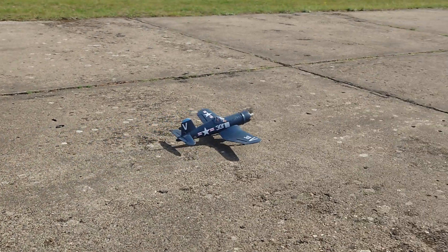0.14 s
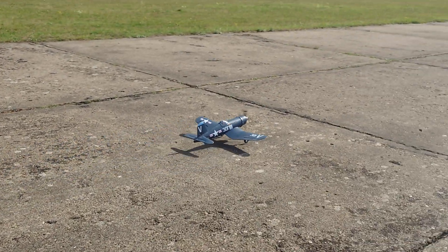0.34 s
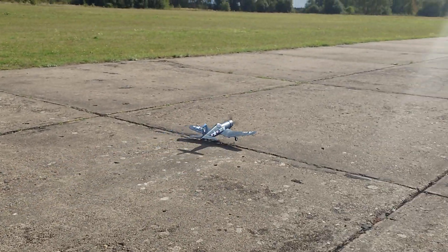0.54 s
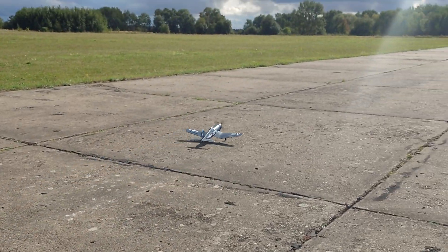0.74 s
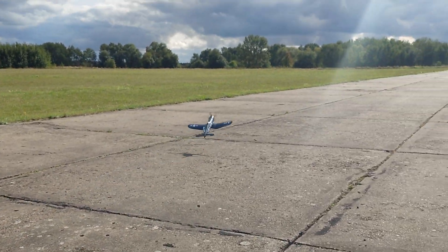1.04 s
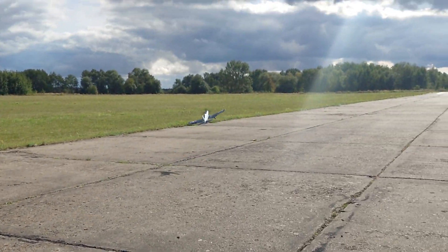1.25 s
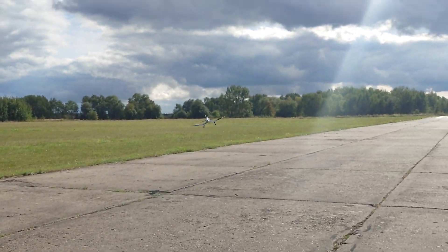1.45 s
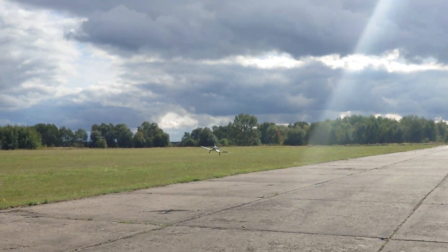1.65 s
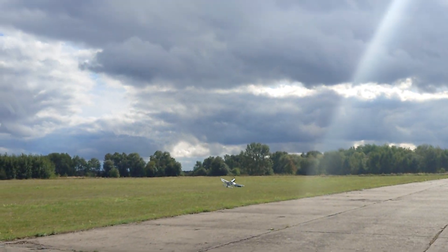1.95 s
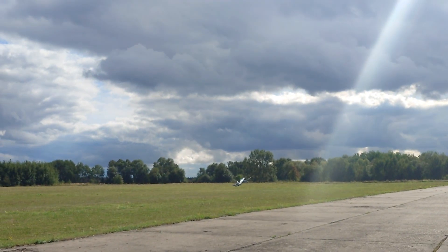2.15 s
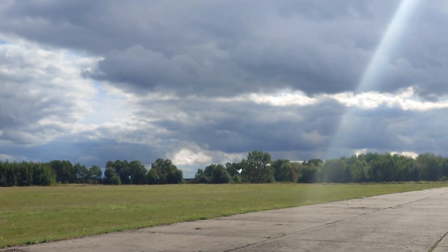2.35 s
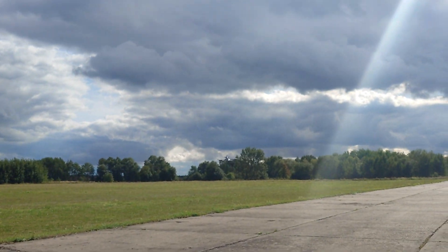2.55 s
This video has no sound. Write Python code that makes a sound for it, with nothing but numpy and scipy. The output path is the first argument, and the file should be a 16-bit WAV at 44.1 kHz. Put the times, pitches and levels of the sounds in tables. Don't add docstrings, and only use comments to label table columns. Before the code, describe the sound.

A small electric model plane rolls at full throttle over rough concrete, whining shrilly and rattling with sharp snaps, then lifts off and fades into the distance; wind buffets the close outdoor microphone.

```python
import sys
import numpy as np
from scipy import signal
from scipy.fft import rfft, irfft
from scipy.io import wavfile
from scipy.ndimage import uniform_filter1d

SR = 44100
rng = np.random.default_rng(int(sys.argv[2]) if len(sys.argv) > 2 else 0)


def inscribe(sig):
    pcm = np.round(np.clip(np.atleast_2d(sig).T, -1, 1) * 32767)
    wavfile.write(sys.argv[1], SR, pcm.astype(np.int16))


def boost_factor(decibels):
    exponent = np.asarray(decibels, float) / 20
    return 10 ** exponent


N = 119070
T = np.arange(N) / SR

# [t/s, level/dB]
PROP_LEVEL = [(0.0, -45.5), (0.36, -41.5), (0.61, -41.5), (0.89, -43), (1.62, -56.5), (1.79, -63.5),
              (2.04, -69), (2.35, -59), (2.53, -62.5), (2.7, -73.5)]


def rms_one(x):
    return x / np.sqrt(np.mean(x ** 2) + 1e-20)


def in_time(rows):
    seconds, *columns = np.transpose(rows)
    return [np.interp(T, seconds, column) for column in columns]


def drift(rate_hz):
    r = np.exp(-80 * np.pi * rate_hz / SR)
    slow = signal.lfilter([1], [1, -2 * r, r * r], rng.standard_normal(N // 40 + 2002))
    slow = rms_one(slow[2000:])
    return np.interp(np.arange(N) / 40, np.arange(len(slow)), slow)


def resonate(x, hz, width_hz):
    r = np.exp(-np.pi * width_hz / SR)
    poles = [1, -2 * r * np.cos(2 * np.pi * hz / SR), r * r]
    return signal.lfilter(np.array([1, 0, -1]) * (1 - r * r) / 2, poles, x)


def butter(x, order, hz, kind):
    return signal.sosfilt(signal.butter(order, hz, kind, fs=SR, output="sos"), x)


def colour(x, spectrum, patchy_db):
    spectrum_hz, spectrum_db = np.transpose(spectrum)
    edges = 140 * 2 ** np.arange(0, 7.2, 1 / 3)
    out = 0
    for k, (low, high) in enumerate(zip(edges, edges[1:])):
        middle = np.log(low * high) / 2
        level_db = np.interp(middle, np.log(spectrum_hz), spectrum_db)
        band = butter(x[k % 2], 2, [low, high], "band")
        out = out + boost_factor(level_db + patchy_db * drift(8.2)) * band
    return rms_one(out)


def grit(per_s, spread_db):
    size = boost_factor(spread_db * np.minimum(rng.exponential(1, (2, N)), 4.0))
    size = size * rng.choice([-1, 1], (2, N))
    return rms_one(size * (rng.random((2, N)) < per_s / SR))


def tone(hz):
    return np.sqrt(2) * np.sin(2 * np.pi * np.cumsum(hz) / SR)


def motor_pitch_and_level():
    # [t/s, f/Hz, level/dB]
    whine = [(0, 5485, -36), (.04, 5615, -28.5), (.1, 5742, -28.5), (.2, 5848, -32), (.33, 5895, -37),
             (.62, 5900, -46), (1.05, 5896, -44.5), (1.33, 5925, -50), (1.61, 5936, -57), (1.72, 5390, -69),
             (1.85, 4800, -70), (1.99, 4455, -65), (2.075, 4350, -69), (2.2, 4975, -58), (2.3, 5305, -46),
             (2.44, 5485, -53), (2.56, 5360, -62), (2.7, 4870, -64)]
    hz, db = in_time(whine)
    return uniform_filter1d(hz, size=2200), db


def motor_whine(hz, db):
    flutter_db = 2.0 * drift(7.1) + 1.26 * drift(135)
    return boost_factor(db + flutter_db) * tone(hz + 4.0 * drift(17.7))


def drive_train(whine_hz):
    # [multiple of whine, blur/Hz]
    orders = [(.099, 14), (.075, 20), (.247, 16), (.31, 35), (.5, 10), (.632, 8), (.79, 90), (.89, 55),
              (1.09, 12)]
    # [rolling/dB, climbing/dB, throttled back/dB, banked/dB, leaving/dB]
    order_db = [(-51, -74, -90, -74, -89), (-78, -83, -85, -83, -80), (-48, -77, -75, -66.5, -72),
                (-74, -113, -68.5, -77, -98), (-86, -94, -100, -66.5, -88), (-51, -63.5, -85.5, -84, -80),
                (-105, -61.5, -74, -57.5, -93), (-69, -80, -88, -79, -57.5), (-85, -93, -95, -68, -79)]
    stages = [.6, 1.7, 2.05, 2.4, 2.65]
    spool_up_db, spool_up_s = -12, 0.45
    clean_below_hz = 20
    prop_db, = in_time(PROP_LEVEL)
    sway_db = 0.4 * (prop_db - uniform_filter1d(prop_db, size=30000))
    spool_db = spool_up_db * np.clip(1 - T / spool_up_s, 0, 1)
    out = 0
    for (share, blur_hz), stage_db in zip(orders, order_db):
        level_db = np.interp(T, stages, stage_db) + sway_db + spool_db
        firm = clean_below_hz / blur_hz
        rough = (firm + drift(blur_hz * 2)) / np.hypot(1, firm)
        out = out + boost_factor(level_db + drift(5)) * rough * tone(share * whine_hz + 6 * drift(30))
    return out


def speed_controller(whine_hz):
    # [start t/s, length/s, level/dB]
    swells = [
        (1.62, 0.063, -57),
        (1.687, 0.21, -50.5),
        (1.916, 0.11, -48),
        (1.999, 0.33, -53),
        (2.31, 0.18, -56),
        (2.555, 0.19, -49.5),
    ]
    # [t/s, level/dB]
    beat = [(1.75, -100), (1.92, -77), (2.08, -69), (2.2, -99), (2.5, -83), (2.6, -80), (2.67, -91),
            (2.7, -95)]
    switch_hz = 7828
    steady_hz = np.full(N, float(switch_hz))
    swell = 0
    for start, length, level_db in swells:
        phase = np.clip((T - start + 0.0089) / (length + 0.01), 0, 1)
        swell = swell + boost_factor(level_db + 2.0) * np.sin(np.pi * phase).clip(0)
    whistle = swell * boost_factor(1.3 * drift(17)) * tone(steady_hz + 8 * drift(6.5))
    sides = 0
    for way, db in ((1.0, -1), (-1.6, -3)):
        sides = sides + boost_factor(2.1 * drift(12) + db) * tone(steady_hz + way * 0.065 * whine_hz)
    sides = boost_factor(-18) * uniform_filter1d(swell, size=6000) * sides
    beat_db, = in_time(beat)
    difference = boost_factor(beat_db + 3 * drift(50)) * tone(steady_hz - whine_hz + 20 * drift(60))
    hiss = resonate(rng.standard_normal(N), 2 * switch_hz, 1000)
    hiss = boost_factor(-78) * rms_one(resonate(hiss, 2 * switch_hz, 1000))
    return whistle + sides + difference + hiss


def motor():
    hz, db = motor_pitch_and_level()
    return motor_whine(hz, db) + drive_train(hz) + speed_controller(hz)


def propeller():
    # [f/Hz, level/dB per Hz]
    rush_colour = [(300, -23.5), (1330, -3.5), (2300, -35.5), (3300, -5.5), (4300, -7), (6500, -8.5),
                   (9000, -13), (13000, -20)]
    # [f/Hz, width/Hz, level/dB]
    cowl_modes = [(4370, 300, -7), (1370, 140, -17)]
    white = rng.standard_normal((2, N))
    cowl = 0
    for hz, width_hz, db in cowl_modes:
        cowl = cowl + boost_factor(db) * rms_one(resonate(resonate(white[0], hz, width_hz), hz, width_hz))
    cowl_shown_s = 1.43
    cowl = cowl * boost_factor(-26 * np.clip((cowl_shown_s - T) / 0.22, 0, 1))
    tips = rms_one(butter(rng.standard_normal(N), 2, [9000, 15000], "band"))
    tips_gone_s = 1.83
    tips = boost_factor(-5) * np.clip((tips_gone_s - T) / 0.1, 0, 1) * tips
    rush_db, = in_time(PROP_LEVEL)
    return boost_factor(rush_db + 2) * (colour(white, rush_colour, patchy_db=0.7) + cowl + tips)


def rolling():
    # [t/s, level/dB]
    roll_level = [
        (0.0, -34.5),
        (0.31, -33),
        (1.062, -37),
        (1.208, -38.5),
        (1.34, -43.5),
        (1.75, -56),
    ]
    # [f/Hz, level/dB per Hz]
    roll_colour = [(300, -47), (560, -4), (1100, 3), (2500, -3), (4500, -14.5), (7000, -19), (11500, -17.5),
                   (15500, -24)]
    # [f/Hz, width/Hz, level/dB]
    body_modes = [(603, 53, -11), (831, 40, -8.5), (1027, 260, -11.5), (1390, 75, -11), (1860, 53, -38),
                  (2278, 93, -14)]
    clicks = grit(9000, 2.4)
    body = 0
    for k, (hz, width_hz, db) in enumerate(body_modes):
        body = body + (-1) ** k * boost_factor(db) * rms_one(resonate(clicks[k % 2], hz, width_hz))
    body = body + boost_factor(-4) * np.exp(-T / 0.27) * rms_one(resonate(clicks[1], 740, 73))
    level_db, = in_time(roll_level)
    level = boost_factor(level_db - 1 + 0.66 * drift(26)) * np.clip((roll_level[-1][0] - T) / 0.33, 0, 1)
    roll = level * (colour(clicks, roll_colour, patchy_db=2.2) + body)
    thin = butter(roll, 4, 1700, "high")
    lift_s, lift_fade_s = 1.35, 0.11
    on_ground = np.clip((lift_s - T) / lift_fade_s + 0.5, 0.12, 1)
    return thin + (roll - thin) * on_ground


def joints():
    # [centre t/s, rms level/dB, half length/s, brightness/dB]
    bumps = [(0.047, -38.5, 0.017, -7), (0.109, -32.5, 0.019, -8), (0.193, -27, 0.013, -8.5),
             (0.234, -30, 0.022, -19), (0.326, -27.5, 0.026, -8.5), (0.358, -27, 0.0039, -22),
             (0.439, -30.5, 0.025, -6), (0.455, -32.5, 0.0058, -11), (0.485, -29, 0.006, -2.5),
             (0.519, -23.5, 0.0024, -6.5), (.55, -28, 0.0068, -8), (0.571, -24.5, 0.013, -10),
             (0.688, -32, 0.024, -8), (0.722, -27.5, 0.0076, -5), (0.896, -32, 0.0095, -4.5),
             (0.926, -36, 0.012, -20), (0.957, -39.5, 0.0047, 5.5), (0.996, -36, 0.02, -1.5),
             (1.071, -42.5, 0.048, 0), (1.21, -44, 0.023, 0.5), (1.182, -45.5, 0.0082, 1),
             (1.363, -43.5, 0.013, -22)]
    rattle = grit(6000, 2.8)[0]
    low = rms_one(butter(rattle, 2, [500, 3500], "band"))
    high = rms_one(butter(rattle, 2, [3200, 11500], "band"))
    out = 0
    for s, db, half, bright_db in bumps:
        burst = boost_factor(db) * np.exp(-((T - s) / max(half, 0.002)) ** 2)
        out = out + burst * (low + boost_factor(bright_db) * high)
    return out


def stones():
    # [t/s, peak level/dB]
    stone_snaps = [(0.188, -32), (0.1979, -17.5), (.3238, -10), (0.3571, -14.5), (0.4382, -22),
                   (.451, -16.5), (.5695, -32), (0.58, -11.5), (0.7177, -11.5), (.736, -39), (.893, -36),
                   (0.9586, -12.5), (0.983, -14.5), (1.341, -43), (1.361, -46)]
    t60_s = 0.008
    level = 0
    for s, db in stone_snaps:
        level = level + boost_factor(db - 10 - 60 * np.maximum(T - s, 0) / t60_s) * (T >= s)
    return 2 * butter(level * rng.standard_normal(N), 2, [1500, 9500], "band")


def wind():
    # [centre t/s, level/dB, half length/s]
    puffs = [(0.022, -48, 0.091), (0.075, -37.5, 0.05), (0.158, -32.5, 0.013), (0.276, -34, 0.055),
             (0.355, -38, 0.029), (0.462, -37, 0.034), (0.537, -37.5, 0.015), (0.595, -34, 0.016),
             (0.644, -29.5, 0.02), (0.678, -27.5, 0.011), (0.713, -30.5, .014), (0.815, -46.5, 0.042),
             (0.91, -46, 0.022), (0.955, -34.5, 0.016), (1.088, -45.5, 0.029), (1.201, -39, 0.043),
             (1.289, -35.5, 0.013), (1.402, -38.5, 0.031), (1.459, -36, 0.026), (1.524, -39.5, 0.014),
             (1.58, -46, 0.0085), (1.635, -47.5, 0.032), (1.77, -53, 0.016), (1.839, -39.5, 0.021),
             (1.975, -65, 0.055), (2.171, -45.5, 0.018), (2.258, -49.5, 0.027), (2.338, -71, 0.018),
             (2.499, -49, 0.017), (2.626, -52, 0.096), (2.7, -51, 0.04)]
    # [top f/Hz, level/dB, growth with strength]
    wind_layers = [(52, 1, 0.29), (137.7, -6, 0.8), (327, -20.5, 2.18), (850, -27, 2.1)]
    # [centre t/s, peak level/dB, f/Hz, half length/s]
    flaps = [(0.628, -32, 396, .005), (.655, -23.5, 490, 0.0032), (0.677, -24.5, 37.7, 0.04),
             (0.663, -30, 1280, 0.0068), (.82, -33, 40, 0.028), (0.941, -35, 90, 0.0094),
             (0.703, -24, 327, 0.004), (1.093, -30, 43, 0.0052), (1.45, -31.5, 42, .012),
             (1.829, -38.5, 60.5, 0.017), (2.614, -37, 35.6, 0.039)]
    power = boost_factor(2 * -68)
    for s, db, half in puffs:
        power = power + boost_factor(2 * db) * np.exp(-((T - s) / max(half, 0.005)) ** 2 * 1.3)
    strength_db = 10 * np.log10(power)
    out = 0
    for hz, layer_db, growth in wind_layers:
        layer = butter(rng.standard_normal(N + SR), 4, [hz / 3, hz], "band")[SR:]
        local_power = uniform_filter1d(layer ** 2, size=int(3 * SR / hz))
        layer = layer / np.sqrt(local_power + 0.4 * np.mean(layer ** 2))
        level_db = -47.5 + growth * (strength_db + 44.5) + layer_db + 4.5 * drift(hz / 6)
        out = out + boost_factor(level_db) * rms_one(layer)
    for s, db, hz, half in flaps:
        out = out + boost_factor(db) * np.exp(-((T - s) / half) ** 2) * np.cos(2 * np.pi * hz * (T - s))
    return out


def knocks():
    # [t/s, peak level/dB]
    taps = [
        (1.517, -54),
        (1.549, -49.5),
        (1.732, -55),
        (2.627, -53),
    ]
    # [f/Hz, level/dB, t60/s]
    housing = [(480, -3, .045), (720, -9, .03)]
    clicks = np.zeros(N) + 1e-18
    for s, db in taps:
        clicks[int(s * SR)] = boost_factor(db + 3.0)
    out = 0
    for hz, db, t60_s in housing:
        r = boost_factor(-60 / (t60_s * SR))
        w = 2 * np.pi * hz / SR
        out = out + boost_factor(db) * signal.lfilter([0, np.sin(w)], [1, -2 * r * np.cos(w), r * r], clicks)
    return out


def distant_field():
    # [f/Hz, level/dB per Hz]
    field_colour = [(150, -52), (400, -15), (1340, -52), (2500, -50), (4390, -5.5), (5800, -25),
                    (9000, -12), (13500, -36)]
    return boost_factor(-63) * colour(rng.standard_normal((2, N)), field_colour, patchy_db=0.4)


def scene():
    wheels = rolling() + joints() + stones()
    mix = motor() + propeller() + wheels + wind() + knocks() + distant_field()
    return mix[None, :]


def band_limit(x):
    return signal.sosfilt(signal.butter(12, 15725, fs=SR, output="sos"), x)


def record(dry):
    # [f/Hz, level/dB]
    mic_response = [(9300, -0.5), (10000, -5.5), (10900, 0), (12000, -2.5), (12700, -10), (15500, -3.5)]
    hz, db = np.transpose(mic_response)
    gain = boost_factor(np.interp(np.fft.rfftfreq(N, 1 / SR), hz, db))
    mix = irfft(rfft(dry) * gain, N)
    return band_limit(mix)


dry = scene()
out = record(dry)
inscribe(out)
```